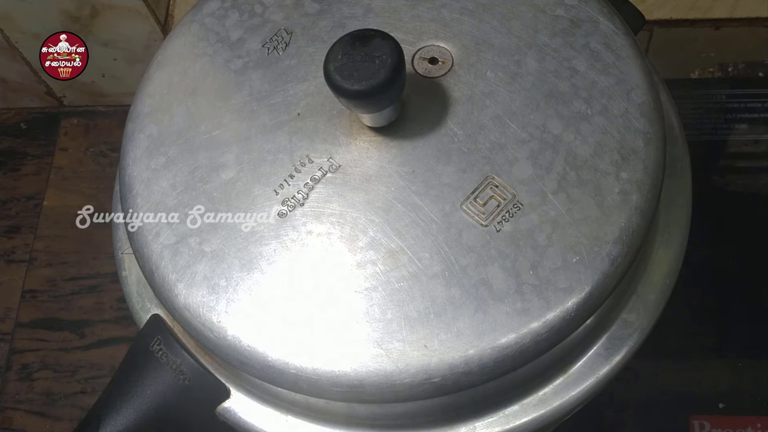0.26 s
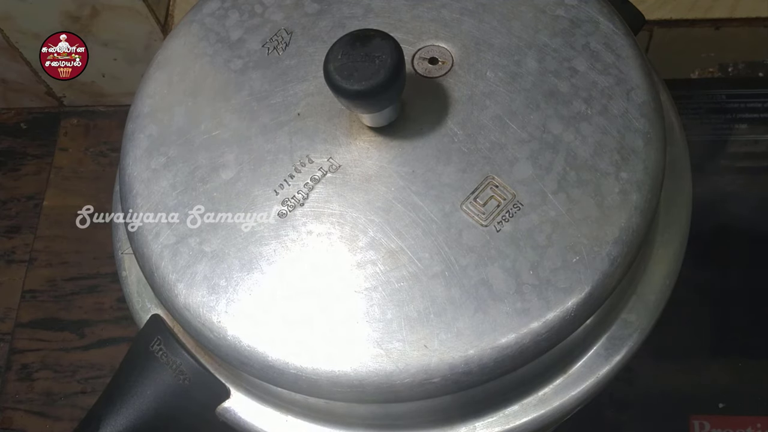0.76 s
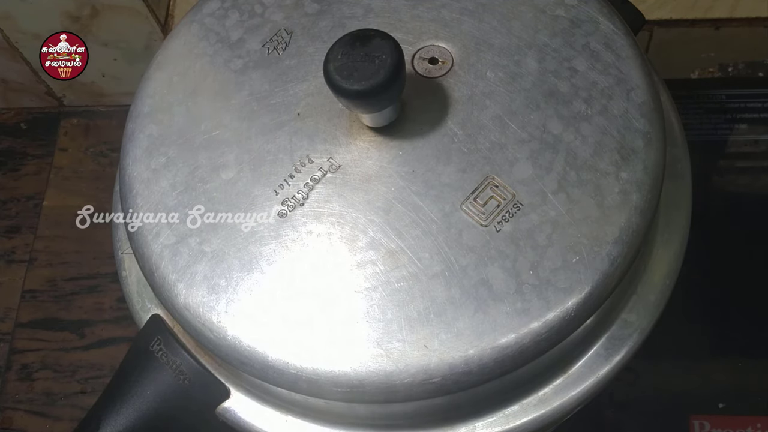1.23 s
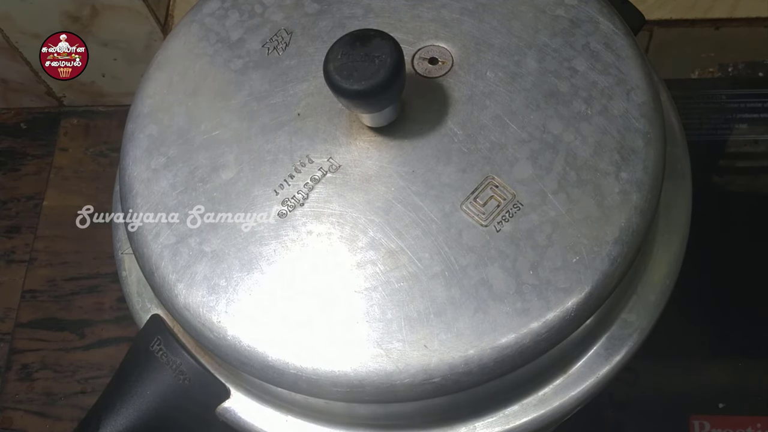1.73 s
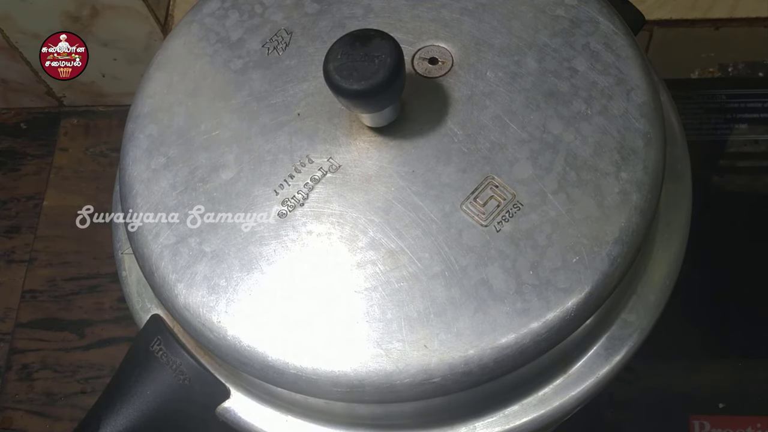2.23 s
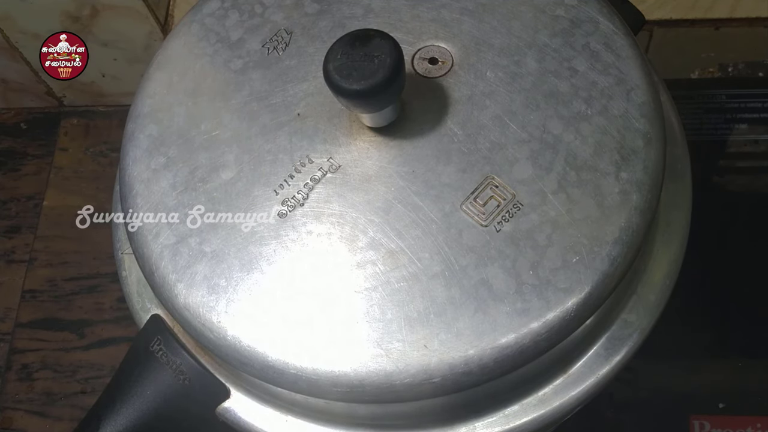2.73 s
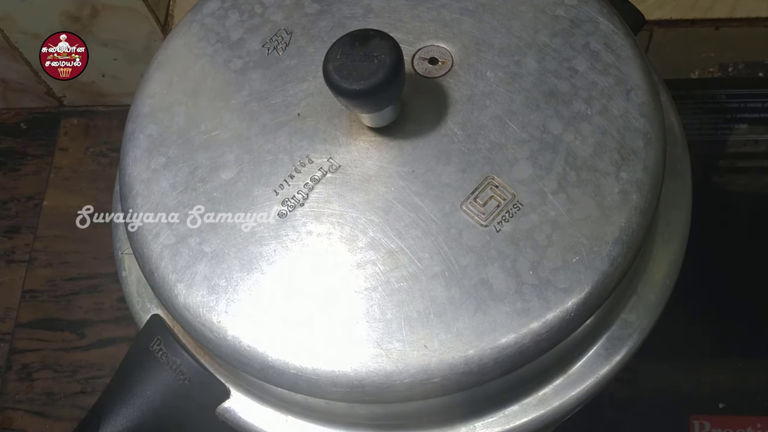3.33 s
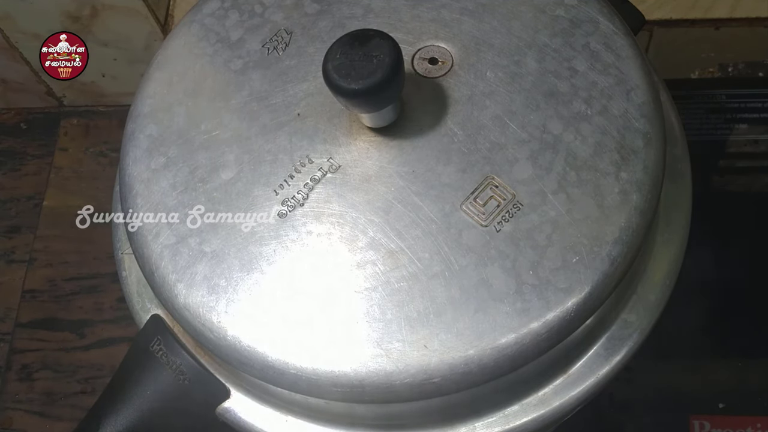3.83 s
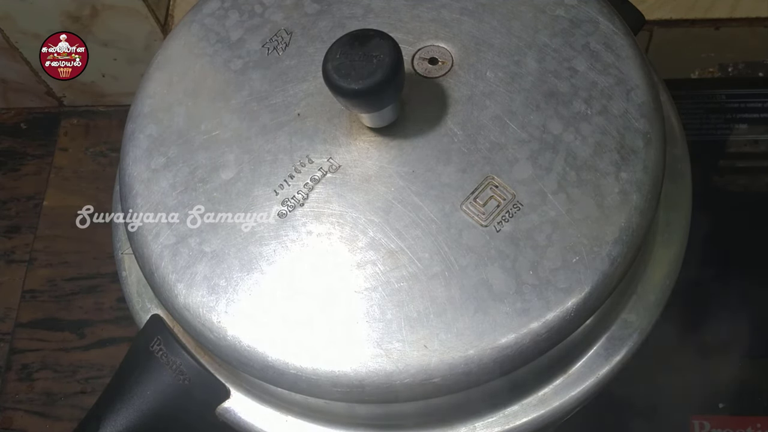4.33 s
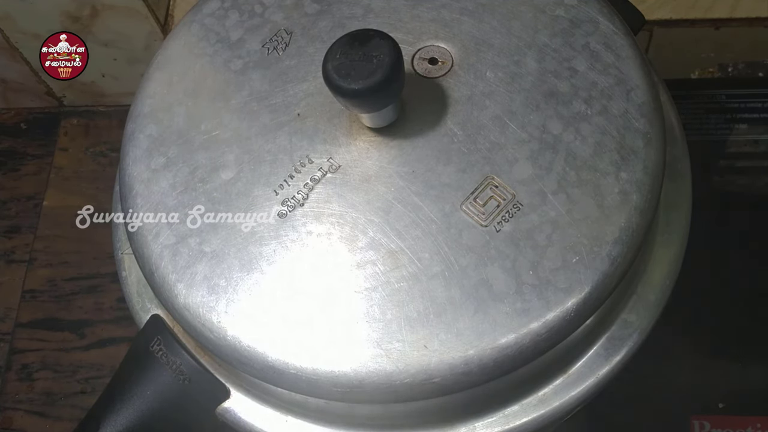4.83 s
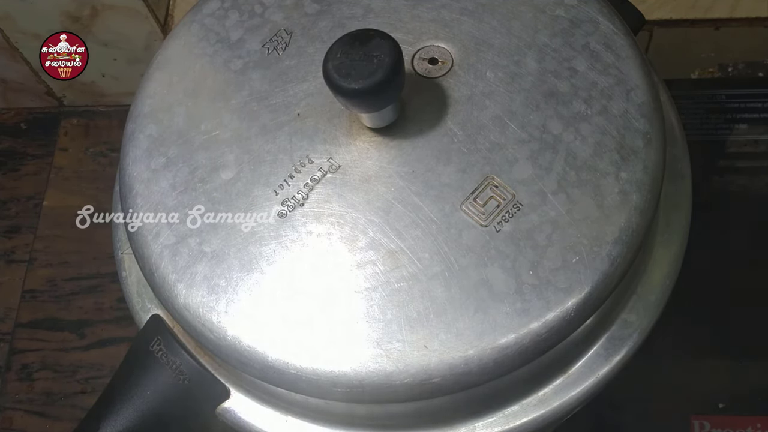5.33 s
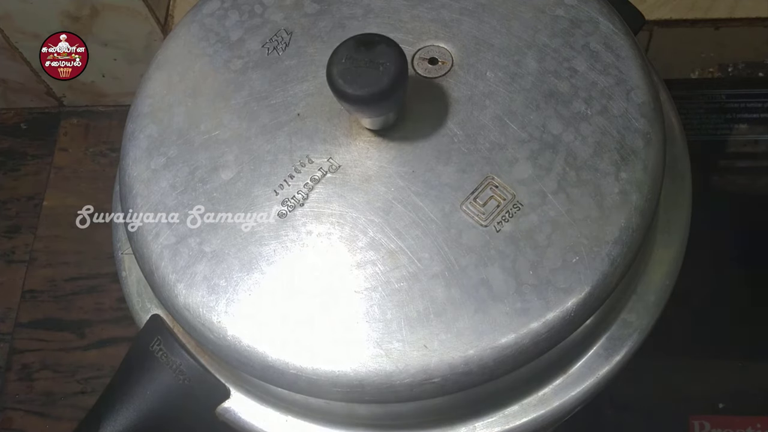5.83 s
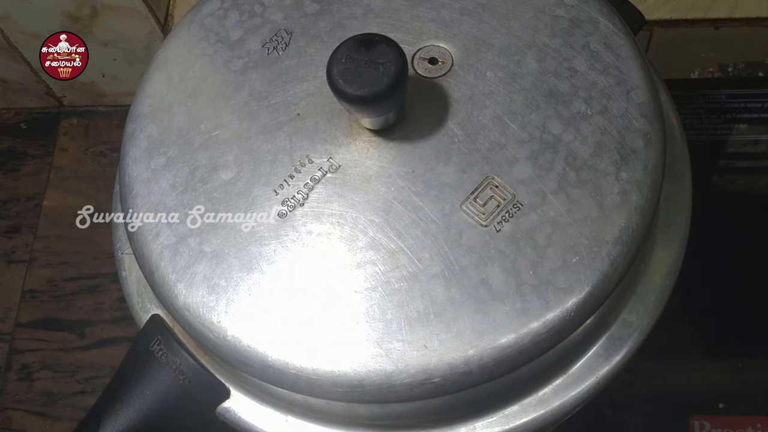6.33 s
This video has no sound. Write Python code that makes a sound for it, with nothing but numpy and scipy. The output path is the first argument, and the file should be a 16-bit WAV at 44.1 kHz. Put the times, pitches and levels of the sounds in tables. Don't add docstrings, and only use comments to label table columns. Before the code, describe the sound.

A stereo phone held near the stove picks up a wide, sharp steam hiss, stronger on the right, fluttering and sputtering softly. After several seconds of almost constant roar it abruptly chokes as a heavy little weight knocks onto its seat, rattling quickly with a short metallic ring. The reflective kitchen echoes, then only thin leaking steam, mains hum and house rumble remain, with faint horns far outside.

```python
import sys
import numpy as np
from scipy import signal
from scipy.fft import rfft, irfft
from scipy.io import wavfile
from scipy.ndimage import uniform_filter1d

SR = 44100
rng = np.random.default_rng(int(sys.argv[2]) if len(sys.argv) > 2 else 0)


def makeup_ratio(level_db):
    decades = np.asarray(level_db, float) / 20
    return 10 ** decades


def bounce(signal):
    frames = np.transpose(np.atleast_2d(signal))
    limited = np.clip(frames, -1, 1)
    pcm = np.round(limited * 32767).astype(np.int16)
    wavfile.write(sys.argv[1], SR, pcm)


N = 289726


def evened(x):
    return x / np.sqrt(np.mean(x ** 2) + 1e-20)


def read(points, hz, column=1):
    table = np.transpose(points)
    return np.interp(np.log(hz + 1), np.log(table[0] + 1), table[column])


def add(mix, start_s, sound):
    part = mix[round(start_s * SR):][:len(sound)]
    part += sound[:len(part)]


# pitch_hz, level_db (per Hz)
RUMBLE_COLOUR = [(25, -28), (60, 2), (110, 3), (160, -3), (210, -11), (300, -3.5), (450, -18), (620, -10.5),
                 (900, -13.5), (1250, -14), (1600, -34), (2300, -29), (3000, -50)]


def house_rumble():
    hz = np.fft.rfftfreq(N, 1 / SR)
    noise = rng.standard_normal((3, N))
    common, left, right = irfft(rfft(noise) * makeup_ratio(read(RUMBLE_COLOUR, hz)), N)
    middle = signal.butter(2, [130, 2200], "band", fs=SR, output="sos")
    loudness = signal.sosfilt(middle, common).std()
    return (common + 0.63 * np.array([left, right])) * makeup_ratio(-62) / loudness


# pitch_hz, level_db (rms)
MAINS_TONES = [
    (49.5, -55),
    (99.9, -59),
    (119.5, -64.5),
]


def mains_hum():
    t = np.arange(N) / SR
    hum = np.zeros(N)
    for pitch_hz, level_db in MAINS_TONES:
        waver = evened(uniform_filter1d(rng.standard_normal(N), size=5000))
        strength = np.sqrt(2) * makeup_ratio(level_db + pitch_hz / 150 * waver)
        hum += strength * np.sin(2 * np.pi * (pitch_hz * t + rng.random()))
    return hum


# start_s, end_s, pitch_hz, level_db
STREET_HORNS = [
    (5.92, 6.2, 311, -71),
    (6.36, 6.48, 305, -76),
    (6.48, 6.62, 343, -66),
]
HORN_OVERTONES = [5.5, 6, 1, -12]


def street_horns():
    horns = np.zeros(N)
    for start_s, end_s, pitch_hz, level_db in STREET_HORNS:
        length = round((end_s - start_s) * SR)
        wander = evened(uniform_filter1d(rng.standard_normal(length), size=1500))
        turns = np.cumsum(pitch_hz * (1 + 0.008 * wander)) / SR
        tone = np.zeros(length)
        for k, overtone_db in enumerate(HORN_OVERTONES, 1):
            tone += makeup_ratio(overtone_db) * np.sin(2 * np.pi * k * turns)
        add(horns, start_s, makeup_ratio(level_db) * tone * signal.windows.tukey(length, 0.7))
    return horns


def background():
    return (house_rumble() + mains_hum() + street_horns()) * makeup_ratio([[-2.2], [1.8]])


# pitch_hz, time_to_fall_60_db_s
KITCHEN_DECAY = [(300, 0.97), (1000, 0.86), (4000, 0.46), (10000, 0.3), (15000, 0.1)]


def kitchen(x):
    taps = np.zeros((2, SR))
    slots = np.arange(120, SR - 20, 20)
    at = slots + rng.integers(0, 20, (2, len(slots)))
    np.put_along_axis(taps, at, rng.choice([-1., 1.], at.shape), 1)
    hz, t, z = signal.stft(taps, SR, nperseg=256)
    z *= makeup_ratio(-60 * t / read(KITCHEN_DECAY, hz)[:, None])
    tail = signal.istft(z, SR, nperseg=256)[1]
    return signal.fftconvolve(x[None], tail / np.linalg.norm(tail[0]), axes=1)[:, :N]


def ring(modes):
    t = np.arange(SR) / SR
    dying = np.zeros(SR)
    for pitch_hz, level_db, fall_s in modes:
        dying += makeup_ratio(level_db - 60 * t / fall_s) * np.sin(2 * np.pi * pitch_hz * t)
    return dying * (1 - np.exp(-t / 0.00091))


# start_s, level_db
WEIGHT_KNOCKS = [(5.559, -20), (5.567, -28), (5.573, -32), (5.579, -36), (5.585, -21), (5.592, -43),
                 (5.598, -25.5), (5.605, -46), (5.618, -38), (5.626, -43), (5.661, -41)]
# pitch_hz, level_db, time_to_fall_60_db_s
SEAT_KNOCK = [(522, -26, 0.03), (810, -7, 0.04), (870, -3, 0.04), (960, -5, 0.03), (1120, -7, 0.03),
              (1700, -16, 0.012)]
# pitch_hz, level_db, time_to_fall_60_db_s
LID_RING = [(755, -31, .35), (793, -22, .55), (834, -19.5, .7), (862, -27, .5), (908, -24, .4),
            (990, -30, .12), (1165, -25, .22), (1225, -32, .45)]


def weight():
    blows = np.zeros(N)
    knock = ring(SEAT_KNOCK)
    for start_s, level_db in WEIGHT_KNOCKS:
        add(blows, start_s - 0.001, makeup_ratio(level_db + 8.0) * knock)
    landing_s = WEIGHT_KNOCKS[0][0]
    add(blows, landing_s, makeup_ratio(-19) * ring(LID_RING))
    return blows * makeup_ratio([[-1.5], [1.5]]) + makeup_ratio(-18) * kitchen(blows)


# pitch_hz, change_db
THINNED_COLOUR = [(800, -7.5), (2400, -5), (3700, -6.5), (6000, -3), (9000, -0.5), (12000, 2.5),
                  (13500, 1.5), (15500, 3)]
# pitch_hz, share_of_power (0-1), lag_of_left_rad
STRAIGHT_PATH = [(300, 0.43, 1.2), (1560, 0.19, 0.36), (3000, 0.62, 1.66), (4430, 0.64, 1.36),
                 (5030, 0.21, 1.1), (8050, 0.08, 6.4), (10550, 0.73, 3.73), (11720, 0, 3.94),
                 (12700, 0.6, 5.5), (15000, 0.1, 3.6)]


def hiss(strength_db, thinning, left, right, patchy_db, flutter_db, early_db):
    hop = 128
    frames, hz = N // hop + 5, np.fft.rfftfreq(512, 1 / SR)
    t = np.arange(frames) * hop / SR
    draws = rng.standard_normal((frames, 257, 7)).T
    straight, *scattered = draws[:3] + 1j * draws[3:6]

    patches = uniform_filter1d(uniform_filter1d(draws[6], size=8, axis=0), size=30, axis=1)
    flutter = evened(uniform_filter1d(rng.standard_normal(frames), size=12))
    level_db = np.outer(read(THINNED_COLOUR, hz), thinning(t)) + strength_db(t)
    level_db = level_db + patchy_db * evened(patches) + flutter_db * flutter
    power = makeup_ratio(level_db) ** 2

    keep = makeup_ratio(-2 * 60 * hop / SR / read(KITCHEN_DECAY, hz))
    stored = np.array([signal.lfilter([1 - k], [1, -k], p, zi=[k * p[0]])[0]
                       for k, p in zip(keep, power)])
    share = np.clip(read(STRAIGHT_PATH, hz), 0, 1)[:, None]
    lag = np.exp(-1j * np.outer([1, 0], read(STRAIGHT_PATH, hz, column=2)))[..., None]
    z = lag * np.sqrt(share * power) * straight + np.sqrt((1 - share) * stored) * scattered
    z *= makeup_ratio([read(left, hz), read(right, hz)])[..., None]
    z *= hz[:, None] ** 2 / (hz[:, None] ** 2 + 670.0 ** 2)
    x = signal.istft(z, nperseg=512, noverlap=512 - hop)[1][:, :N] * np.sqrt(SR / 512 * 1.5)

    early = rng.standard_normal((2, 3000)) * np.exp(-np.arange(3000) / 500.)
    early *= makeup_ratio(early_db) / np.linalg.norm(early, axis=1, keepdims=True)
    early[:, 0] = 1
    return signal.oaconvolve(x, early, axes=1)[:, :N] / np.sqrt(1 + makeup_ratio(early_db) ** 2)


# pitch_hz, level_db (per Hz)
LEAK_AT_LEFT = [(40, -79.0), (300, -112), (800, -99), (1500, -96), (2400, -104.4), (3700, -103),
                (5200, -105.0), (6600, -107.3), (7900, -115.0), (8800, -111.9), (10300, -101.2),
                (11800, -97), (13500, -104.9), (15500, -104.4)]
# pitch_hz, level_db (per Hz)
LEAK_AT_RIGHT = [(40, -74.7), (300, -116), (800, -88), (1500, -93.5), (2400, -103.1), (3700, -99.5),
                 (5200, -100.8), (6600, -102), (7900, -106.0), (8800, -103.0), (10300, -91.5), (11800, -98),
                 (13500, -103.3), (15500, -100.2)]


def leak():
    return makeup_ratio(-0.5) * hiss(np.zeros_like, np.zeros_like, LEAK_AT_LEFT, LEAK_AT_RIGHT,
                            patchy_db=0.6, flutter_db=0.7, early_db=-8)


def ramp(t, start_s, length_s):
    return np.clip((t - start_s) / length_s, 0, 1)


def jet_strength_db(t):
    sink_s, shut_s = 5.5, 5.54
    sinking_db = -5 * ramp(t, sink_s, shut_s - sink_s)
    shutting_db = -11 * ramp(t, shut_s, 0.015)
    bleeding_db = -105.0 * np.maximum(t - shut_s, 0)
    return 0.81 + sinking_db + shutting_db + bleeding_db


def jet_thinning(t):
    return 0.13 + 0.049 * t + 0.5 * ramp(t, 3.65, 0.08)


# pitch_hz, level_db (per Hz)
JET_AT_LEFT = [(40, -85), (300, -79.5), (800, -85.5), (1500, -76.5), (2400, -76), (3700, -68),
               (5200, -68.5), (6600, -77), (7900, -83), (8800, -80), (10300, -62), (11800, -67),
               (13500, -70.5), (15500, -68.5)]
# pitch_hz, level_db (per Hz)
JET_AT_RIGHT = [(40, -48), (300, -71.5), (800, -77.5), (1500, -75.5), (2400, -72.5), (3700, -63.5),
                (5200, -68), (6600, -70), (7900, -73), (8800, -66), (10300, -58), (11800, -66.5),
                (13500, -60.5), (15500, -72.5)]


def steam_jet():
    return makeup_ratio(11.0) * hiss(jet_strength_db, jet_thinning, JET_AT_LEFT, JET_AT_RIGHT,
                            patchy_db=0.7, flutter_db=0.52, early_db=-10)


def scene():
    return background() + weight() + leak() + steam_jet()


# time_s, extra_db
WET_SURGES = [(.36, 2), (.97, 7.5), (1.2, 6), (1.29, 5.5), (1.73, 4.5), (2.05, 0.5), (2.9, 5), (3.08, 4.5),
              (3.65, 1.5), (3.78, 1), (4.0, 2.5), (4.55, 4), (5.37, 1)]


def overload(x):
    t = np.arange(N) / SR
    surge_db = sum(db * np.exp(-((t - time_s) / 0.027) ** 2) for time_s, db in WET_SURGES)
    bend = x ** 2 * makeup_ratio(surge_db)
    bend = bend - uniform_filter1d(bend, size=2000)
    low = signal.butter(2, [35, 2500], "band", fs=SR, output="sos")
    return x + makeup_ratio([[-21], [-11.5]]) * signal.sosfilt(low, bend)


def gain_control(x):
    power = uniform_filter1d((x ** 2).mean(0), size=2600)
    over_db = np.maximum(10 * np.log10(abs(power) + 1e-12) + 40, 0)
    return x / makeup_ratio(0.37 * uniform_filter1d(over_db, size=2000))


def top_gate(x):
    hz, t, z = signal.stft(x, SR, nperseg=1024)
    power = uniform_filter1d((x ** 2).mean(0), size=2000)
    quiet = power[np.minimum((t * SR).astype(int), N - 1)] < makeup_ratio(-40) ** 2
    noise = rng.standard_normal((len(t), len(hz)))
    wander = evened(uniform_filter1d(uniform_filter1d(noise, size=5, axis=0), size=12, axis=1)).T
    edge_hz = np.maximum(14900 + 800 * wander, 13400)
    shut = quiet & (hz[:, None] > edge_hz)
    return signal.istft(z * ~shut, SR, nperseg=1024)[1][:, :N]


def top_cut(x):
    return signal.sosfilt(signal.butter(12, 15680, fs=SR, output="sos"), x)


def record(dry):
    held = gain_control(overload(dry))
    finished = top_gate(held)
    return top_cut(finished)


dry = scene()
out = record(dry)
bounce(out)
```